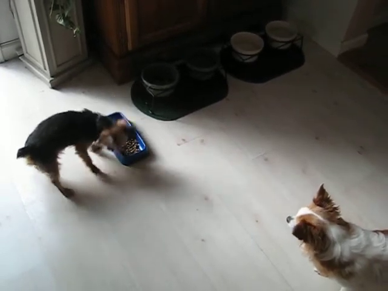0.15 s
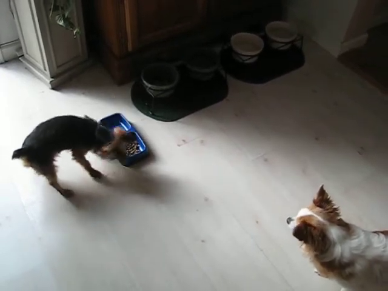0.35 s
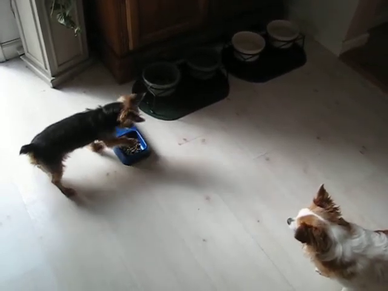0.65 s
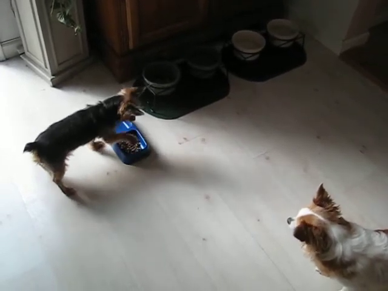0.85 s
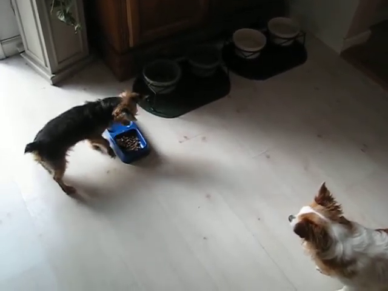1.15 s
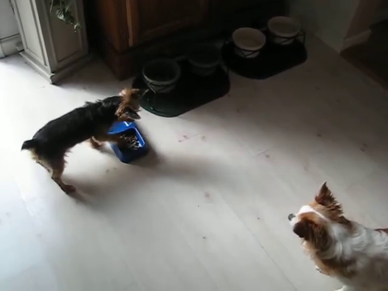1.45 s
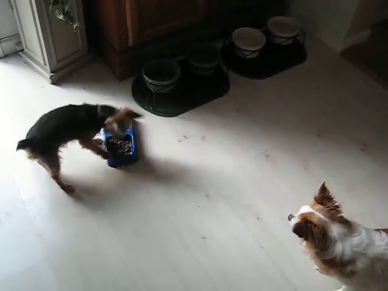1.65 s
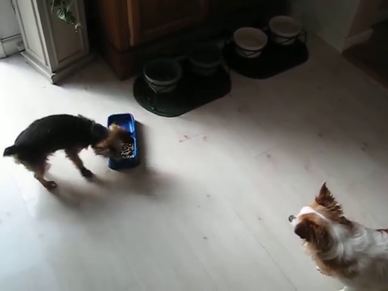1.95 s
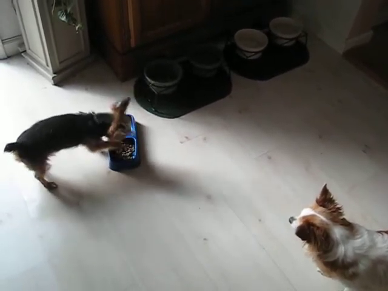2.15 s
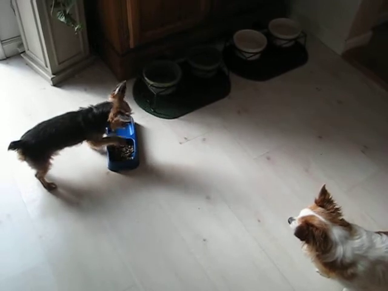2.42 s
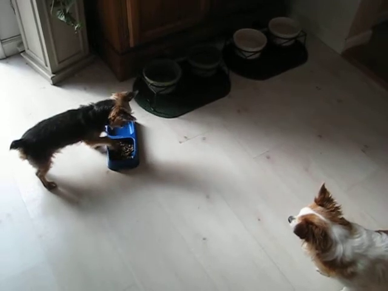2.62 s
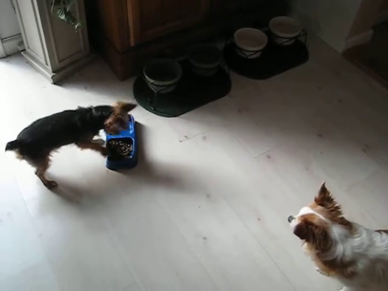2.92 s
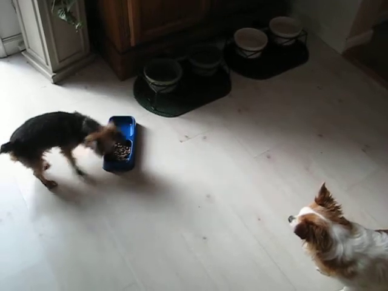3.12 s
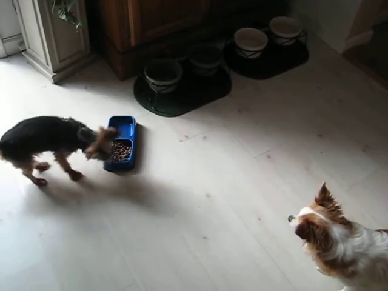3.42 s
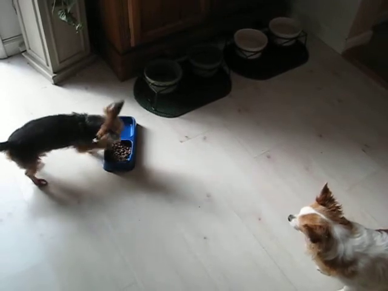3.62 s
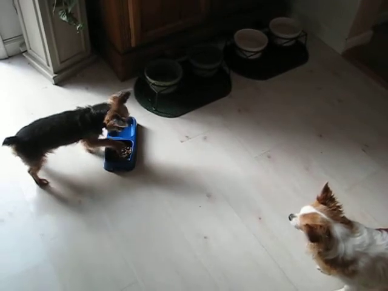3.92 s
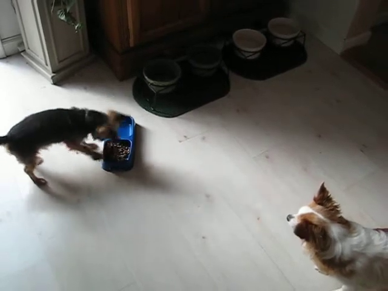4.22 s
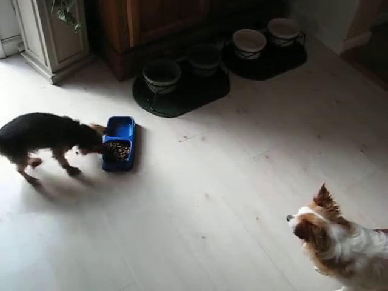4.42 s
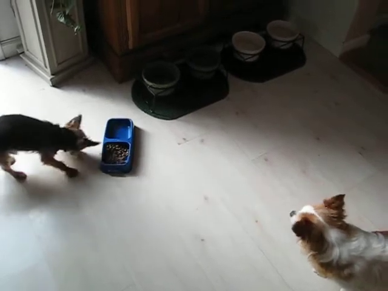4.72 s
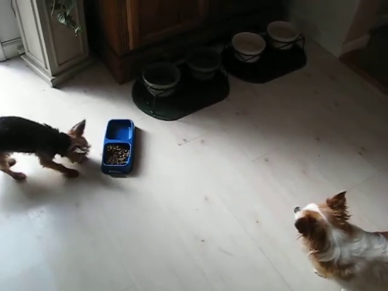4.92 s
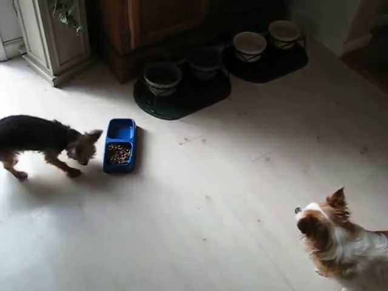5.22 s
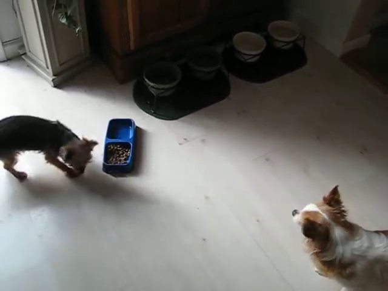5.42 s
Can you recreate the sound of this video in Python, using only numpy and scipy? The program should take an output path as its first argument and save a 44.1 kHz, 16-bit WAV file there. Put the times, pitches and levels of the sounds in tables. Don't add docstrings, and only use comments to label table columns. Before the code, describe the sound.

A small dog paws at a plastic bowl of dry kibble on a hard floor in a bare, lively kitchen. A faint fading rake opens over soft hiss. At 0.7 s a hard pull cracks and rattles the pellets with a dull paw slap, and a second follows at 0.95. From 1.4 to 1.7 s a longer rake clatters, claws scratching, the bowl wall drumming and the base juddering as it is shoved. A few clicks trail off; a brief touch and nudge come near 2.3, then two small pellet drops. Raking returns at 2.75-3.1 s with another push, followed by sparse floor ticks. A sharp double pull hits at 3.8, with stray clicks until 4.5. From 4.75 to 5.1 s there is only faint nosing and a tiny tag jingle, loudest near 5.0. A weak distant appliance whine wavers to the end, about 5.6 s. Mono, with a short room tail.

```python
import sys
import numpy as np
from scipy import signal
from scipy.fft import rfft, irfft, next_fast_len
from scipy.io import wavfile
from scipy.ndimage import uniform_filter1d

SR = 44100
rng = np.random.default_rng(int(sys.argv[2]) if len(sys.argv) > 2 else 0)


def gain_from_decibels(decibels):
    exponent = np.asarray(decibels, float) / 20
    return 10 ** exponent


def generate_wav(signal):
    frames = np.transpose(np.atleast_2d(signal))
    scaled = np.clip(frames, -1, 1) * 32767
    pcm = np.round(scaled).astype(np.int16)
    wavfile.write(sys.argv[1], SR, pcm)


N = 245637


def rms_one(x):
    return x / np.sqrt(np.mean(x ** 2) + 1e-20)


def at_hz(points, hz):
    table = np.array(points)
    return np.interp(np.log(hz), np.log(table[:, 0]), table[:, 1])


def resonate(x, hz, width_hz):
    radius, angle = np.exp(-np.pi * width_hz / SR), 2 * np.pi * hz / SR
    feed = [(1 - radius ** 2) / 2, 0, (radius ** 2 - 1) / 2]
    return signal.lfilter(feed, [1, -2 * radius * np.cos(angle), radius ** 2], x + 1e-18)


def dull(x, cut_hz):
    return signal.sosfilt(signal.butter(2, cut_hz, fs=SR, output="sos"), x)


def thin(x, cut_hz, order=3):
    return signal.sosfilt(signal.butter(order, cut_hz, "high", fs=SR, output="sos"), x)


def grains(modes, per_s, spread_db, widen):
    born = rng.random(N) < per_s / SR
    sizes = born * gain_from_decibels(abs(spread_db) * np.minimum(rng.exponential(1, N), 4))
    total = 0
    for hz, width_hz, db in modes:
        strikes = sizes * rng.standard_normal(N)
        total = total + gain_from_decibels(db) * resonate(strikes, hz, width_hz * widen)
    return rms_one(total)


# start_s, level_db
SWIPE_FORCES = [
    [(0.0, -25.5), (0.014, -30.5), (0.03, -36), (0.06, -34.5)],
    [(0.688, -27), (0.702, -10.5), (0.731, -30), (0.774, -16.5), (0.817, -36), (0.86, -33)],
    [(0.927, -32), (0.941, -17.5), (0.968, -21), (1.009, -25.5), (1.05, -32)],
    [(1.378, -34), (1.392, -13.5), (1.431, -21), (1.483, -21.5), (1.536, -19), (1.589, -27), (1.67, -29),
     (1.8, -44)],
    [(2.275, -24), (2.289, -41), (2.33, -47)],
    [(2.75, -24.5), (2.764, -21), (2.801, -23), (2.853, -24), (2.904, -36), (2.956, -31.5), (3.007, -54),
     (3.11, -61)],
    [(3.785, -33), (3.799, -11), (3.826, -30.5), (3.868, -19.5), (3.909, -30.5), (3.95, -49)],
    [(4.73, -62), (4.78, -56), (4.86, -71), (4.93, -71), (4.98, -64), (5.03, -53), (5.08, -57)],
]


def swipe_gain(extra_db):
    t, gain = np.arange(N) / SR, np.zeros(N)
    for rows, db in zip(map(np.array, SWIPE_FORCES), extra_db):
        inside = (t >= rows[0, 0]) & (t <= rows[-1, 0])
        gain[inside] = gain_from_decibels(db + np.interp(t[inside], *rows.T))
    return uniform_filter1d(gain, size=88)


# pitch_hz, width_hz, level_db
PELLET_MODES = [(2060, 790, 1), (2300, 580, 6.5), (2500, 430, 0.5), (2890, 370, 3.5)]


def pellet_rattle():
    rattle = grains(PELLET_MODES, per_s=1500, spread_db=1.8, widen=.7)
    return dull(rattle, cut_hz=3500) * swipe_gain(np.zeros(len(SWIPE_FORCES)))


# pitch_hz, width_hz, level_db
WALL_MODES = [(1263, 27, -7.5), (1380, 84, -7.5)]
WALL_SHARES = [1, -5.5, 0.5, 0.5, -5, 1.5, -1, 2]


def wall_drum():
    lag_s = 0.015
    late = np.roll(swipe_gain(WALL_SHARES), round(lag_s * SR))
    late = uniform_filter1d(late, size=1000)
    drum = dull(grains(WALL_MODES, per_s=700, spread_db=3.0, widen=3.6), cut_hz=1700)
    return drum * (gain_from_decibels(-6) * late + shove_gain(axis=3))


# pitch_hz, width_hz, level_db
BASE_MODES = [(228, 15, -12), (399, 33, -3.5), (505, 12, -10), (621, 90, 6), (808, 51, 1)]
BASE_SHARES = [-13, -22.5, -21.5, -17.5, -16, -16.5, -19.5, -23]


def base_judder():
    judder = dull(grains(BASE_MODES, per_s=1000, spread_db=-3.0, widen=1.6), cut_hz=2600)
    return judder * (swipe_gain(BASE_SHARES) + shove_gain(axis=2))


# pitch_hz, width_hz, level_db
CLAW_MODES = [(3550, 750, 22), (4700, 750, 14), (5660, 1750, 14.5), (7800, 2200, -29), (11500, 3500, -13)]
# pitch_hz, width_hz, level_db
CRUMB_MODES = [(8600, 4600, -4), (12200, 3700, -4)]
CLAW_SHARES = [-4, -6.5, -3, -4, -23, -2, -6.5, 9.5]


def claw_scratch():
    scratch = dull(grains(CLAW_MODES, per_s=2500, spread_db=-0.3, widen=0.98), cut_hz=7700)
    crumbs = grains(CRUMB_MODES, per_s=900, spread_db=1.0, widen=1)
    return (scratch + gain_from_decibels(-18.5) * crumbs) * swipe_gain(CLAW_SHARES)


def swipes():
    light = gain_from_decibels(-5.5) * pellet_rattle() + gain_from_decibels(-4.5) * wall_drum() + gain_from_decibels(-4) * claw_scratch()
    heavy = base_judder() + floor_rumble()
    return thin(light, cut_hz=1100) + gain_from_decibels(-4.0) * heavy


# pitch_hz, t60_s
ROOM_DECAY = [(250, 0.5), (1300, 0.45), (3500, 0.41), (9000, 0.5), (15000, 0.042)]
# delay_s, level_db
EARLY_ECHOES = [(.004, -17), (.017, -14), (.024, -17)]


def kitchen(x, wet_db, onset_s):
    t = np.arange(SR // 2) / SR
    tail, edges = 0, 150 * 2 ** np.arange(0, 7, .5)
    for low, high in zip(edges, edges[1:]):
        half_octave = signal.butter(2, [low, high], "band", fs=SR, output="sos")
        band = signal.sosfilt(half_octave, rng.standard_normal(len(t)))
        tail = tail + band * gain_from_decibels(-60 * t / at_hz(ROOM_DECAY, np.sqrt(low * high)))
    tail = tail * (1 - np.exp(-(t / onset_s) ** 2))
    response = gain_from_decibels(wet_db) * tail / np.sqrt(np.sum(tail ** 2))
    for s, db in EARLY_ECHOES:
        response[round(s * SR)] += gain_from_decibels(db)
    direct, to_walls = x
    return direct + signal.fftconvolve(to_walls, response)[:N]


# pitch_hz, level_db per Hz
HISS_SPECTRUM = [(20, -8.5), (195, 0.5), (492, -1.5), (1240, -5.5), (2370, -9.5), (7510, -14), (8170, -18),
                 (16500, -24)]
# pitch_hz, level_db rms
WHINE_TONES = [(7559, -61.5), (15135, -67.5)]


def camera_noise():
    size = next_fast_len(N)
    hz = np.maximum(np.arange(size // 2 + 1) * SR / size, 1)
    spectrum = rfft(rng.standard_normal(size)) * gain_from_decibels(at_hz(HISS_SPECTRUM, hz))
    noise = rms_one(irfft(spectrum, size)[:N]) * gain_from_decibels(-48)
    t, wander = np.arange(N) / SR, np.cumsum(rng.standard_normal(N)) * 0.0074
    for f, db in WHINE_TONES:
        noise = noise + gain_from_decibels(db + 1.5) * np.sin(2 * np.pi * f * t + wander * f / 7559)
    return noise


def knock(hz, body_db, crack_db, shiver_db, hard_db, draw):
    t = np.arange(len(draw)) / SR
    turns = 2 * np.pi * hz * t
    ring = np.sin(turns) * np.exp(-t * hz / 1.5)
    ring = ring + .5 * np.sin(turns * (1.5 + .1 * draw[0])) * np.exp(-t * hz / .9)
    ring = ring + .4 * np.sin(turns * (.65 + .05 * draw[1])) * np.exp(-t * hz / 1.4)
    ring = thin(ring * (1 - np.exp(-t * hz / .6)), cut_hz=1150)
    ring = gain_from_decibels(body_db - 1) * ring / np.abs(ring).max()
    chatter = draw[::-1] * np.exp(-t / 0.007)
    shiver = resonate(chatter, min(hz, 4200), 2200) + .4 * resonate(chatter, 2350, 900)
    body = ring + gain_from_decibels(shiver_db + 12) * thin(dull(shiver, cut_hz=5600), cut_hz=1150)
    splinters = (t == 0) + .1 * draw * np.exp(-t / .002)
    heard = [splinters, 1.2 * (t == 0)]
    crack = thin(heard, cut_hz=4200, order=2)
    crack = dull(crack, cut_hz=min(15500 * 2 ** (hard_db / 15), 18000))
    return body + gain_from_decibels(crack_db + 19.5 - 0.19 * hard_db) * crack


# start_s, peak_db, pitch_hz, crack_db re peak
FLUNG_PELLETS = [(0.6925, -8, 2910, -28), (0.708, 0, 3500, -14.5), (0.7164, -2.5, 2480, -27),
                 (0.7968, -15, 2470, -28), (0.939, -2.5, 3020, -10.5), (1.036, -19.5, 2380, -22),
                 (1.3792, -15.5, 3300, -17), (1.3871, -4.5, 3300, -13.5), (1.402, -1.5, 2900, -23),
                 (1.4191, -9, 2930, -29), (1.4355, -2.5, 2900, -18.5), (1.4657, -4, 2700, -29),
                 (1.6265, -6, 3130, -27), (1.6552, -9, 2400, -21), (2.7504, -6, 3080, -16.5),
                 (2.7547, -2.5, 2900, -25), (2.7704, -5.5, 2290, -21), (2.777, -19, 2390, -29),
                 (2.7915, -4.5, 2230, -12.5), (2.9027, -6.5, 3510, -25), (2.9068, -9, 2620, -15.5),
                 (2.9308, -6.5, 4550, -17), (2.9817, -12, 2730, -25), (2.9945, -23, 2890, -21),
                 (3.0184, -6, 3190, -15.5), (3.7876, -11.5, 3500, -12.5), (3.7987, -2.5, 2570, -15.5),
                 (3.8088, -7, 3170, -32), (3.8242, -9, 2450, -26), (3.9195, -21, 2650, -27)]
# start_s, peak_db, pitch_hz, crack_db re peak
FLOOR_STRIKES = [(0.1531, -24, 5530, -4), (0.6877, -37, 3750, -7), (1.0091, -22, 3020, -3.5),
                 (1.8467, -18, 5300, -1.5), (3.034, -33, 3200, -4), (3.0505, -21.5, 1270, -3.5),
                 (3.0551, -28, 1660, 0.5), (3.1271, -15, 4900, -1), (3.443, -22, 6200, 2.5),
                 (3.4488, -32, 6340, -1), (3.507, -30, 5860, -1), (3.7832, -30, 2260, -5),
                 (3.9656, -20, 2140, -1), (3.9717, -13.5, 5660, -7.5), (4.334, -25.5, 7040, 4),
                 (4.3372, -16.5, 5030, -2.5), (4.3534, -25, 6180, -5), (4.5203, -19, 4760, -1),
                 (4.8995, -17.5, 3930, -9), (5.4844, -40, 2500, -9)]
# start_s, peak_db, pitch_hz, crack_db re peak
FURTHER_KNOCKS = [(0.044, -32, 2500, -16), (0.138, -20, 3280, -28), (1.7486, -20, 3490, -13.5),
                  (1.7644, -28, 1210, -6.5), (2.173, -32.5, 3900, -19), (2.1978, -35, 4030, -17),
                  (2.274, -19, 2300, -27), (2.2774, -14.5, 3500, -19), (2.4819, -20.5, 2300, -42),
                  (2.794, -9, 3620, -26), (2.8135, -11, 4400, -22), (2.866, -12.5, 2900, -24),
                  (3.0795, -28, 3180, -17), (3.9457, -28, 1620, -30), (4.0888, -16, 3140, -11),
                  (4.1347, -21.5, 3800, -39), (4.7464, -34, 4160, -12), (4.7845, -31.5, 4830, -21),
                  (4.8398, -31, 4970, -26), (4.8448, -33, 3570, -19), (4.9808, -29, 3510, -12),
                  (5.0114, -25.5, 3600, -17)]
# start_s, peak_db, pitch_hz, crack_db re peak
DROPPED_PELLETS = [
    (2.3439, -16, 2270, -42),
    (2.3831, -13, 2420, -41),
]
SHIVER_LEVELS = -18, -13.5, -15.5, -10


def knocks():
    drops = []
    for s, db, hz, rel_db in DROPPED_PELLETS:
        drops.append((s, db, hz, rel_db))
        for k in (1, 2):
            drops.append((s + k * 0.0016, db - 6.5, hz * 1.04, rel_db))
    out = np.zeros((2, N + 1200))
    groups = FLUNG_PELLETS, FLOOR_STRIKES, FURTHER_KNOCKS, drops
    for rows, shiver_db in zip(groups, SHIVER_LEVELS):
        for s, db, hz, rel_db in rows:
            draw = rng.standard_normal(1200)
            hard_db = -3.5 + 0.86 * rel_db
            start = round(s * SR)
            out[:, start:start + 1200] += knock(hz, db, db + rel_db, db + shiver_db, hard_db, draw)
    return out[:, :N]


# start_s, level_db
LOW_THUMPS = [
    (0.709, -30),
    (1.399, -47),
    (2.792, -28.5),
    (3.8, -33),
]


def thumps():
    thump_hz = 500
    clicks = np.zeros(N)
    for s, db in LOW_THUMPS:
        clicks[round(s * SR)] = gain_from_decibels(db) * SR / thump_hz / 4
    return dull(clicks + 1e-18, cut_hz=thump_hz)


# hardest_push_s, half_length_s, base_db, wall_db
BOWL_SHOVES = [
    (1.552, 0.059, -35.5, -26.5),
    (1.612, 0.03, -25, -28),
    (1.68, 0.079, -35, -29),
    (2.286, 0.0097, -41, -34),
    (2.777, 0.022, -49, -27.5),
    (2.967, 0.051, -32.5, -31.5),
    (3.07, 0.099, -56, -36.5),
    (4.222, .02, -70, -43),
    (4.87, .06, -56, -53),
]


def shove_gain(axis):
    t = np.arange(N) / SR
    return sum(gain_from_decibels(row[axis]) * np.exp(-((t - row[0]) / row[1]) ** 2) for row in BOWL_SHOVES)


# pitch_hz, width_hz, level_db
FLOOR_MODES = [(237, 56, -3.5), (355, 150, -0.5), (483, 78, 0)]


def floor_rumble():
    rumble = grains(FLOOR_MODES, per_s=1500, spread_db=-0.5, widen=0.69)
    return gain_from_decibels(12.5) * rumble * shove_gain(axis=2) ** 2


# pitch_hz, level_db, t60_s
TAG_MODES = [(3550, 0, .03), (4950, -6, .02), (8500, -11, .02)]
# start_s, level_db
TAG_TOUCHES = [
    (4.748, -45),
    (4.786, -47),
    (4.84, -43.5),
    (4.981, -42),
    (5.008, -33),
    (5.022, -44),
    (5.043, -40),
    (5.062, -47),
]


def tag():
    s, db = np.transpose(TAG_TOUCHES)
    out, uneven_db = 0, rng.normal(0, 4, (len(s), len(TAG_MODES)))
    for k, (hz, mode_db, t60_s) in enumerate(TAG_MODES):
        clicks = np.zeros(N)
        clicks[(s * SR).astype(int)] = gain_from_decibels(db + mode_db + uneven_db[:, k])
        radius, angle = gain_from_decibels(-60 / (t60_s * SR)), 2 * np.pi * hz / SR
        poles = [1, -2 * radius * np.cos(angle), radius ** 2]
        out = out + signal.lfilter([0, np.sin(angle)], poles, clicks + 1e-18)
    return out


# start_s, pitch_hz, level_db
APPLIANCE_TRACK = [(4.8, 1162, -65), (4.87, 1173, -53), (4.98, 1183, -54), (5.05, 1190, -65),
                   (5.18, 1213, -59), (5.26, 1240, -62), (5.3, 1268, -54), (5.46, 1326, -57),
                   (5.57, 1240, -49)]


def appliance_whine():
    s, hz, db = np.transpose(APPLIANCE_TRACK)
    t = np.arange(N) / SR
    phase = 2 * np.pi * np.cumsum(np.interp(t, s, hz)) / SR
    slow = signal.lfilter([1], [1, -0.9955], rng.standard_normal((2, N)))
    band = slow[0] * np.cos(phase) + slow[1] * np.sin(phase)
    return rms_one(band) * gain_from_decibels(np.interp(t, s, db, left=-120, right=-120))


def scene():
    sources = swipes() + knocks() + tag() * [[1], [.5]]
    room = kitchen(sources, wet_db=-7.0, onset_s=0.011) + thumps()
    mono = room + appliance_whine() + camera_noise()
    return np.array([mono, mono])


def roll_off(x):
    return signal.sosfilt(signal.butter(12, 17020, fs=SR, output="sos"), x)


def record(dry):
    squeezed = dry / (1 + np.abs(dry / .74) ** 4) ** .25
    low_pass = signal.cheby2(10, 32, 16100, fs=SR, output="sos")
    mix = signal.sosfilt(low_pass, squeezed)
    return roll_off(mix)


dry = scene()
out = record(dry)
generate_wav(out)
```